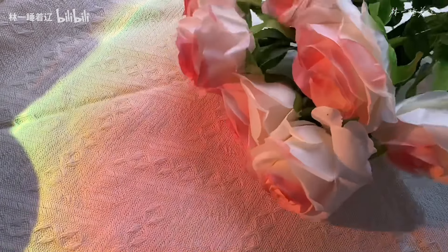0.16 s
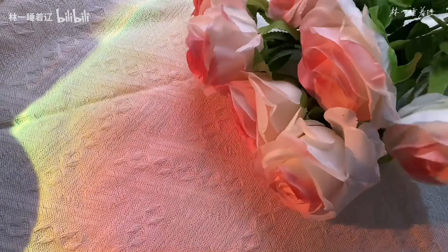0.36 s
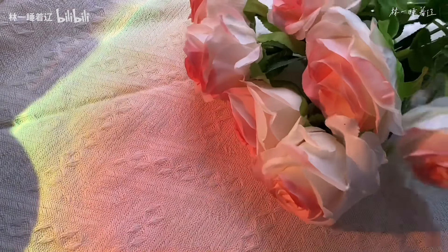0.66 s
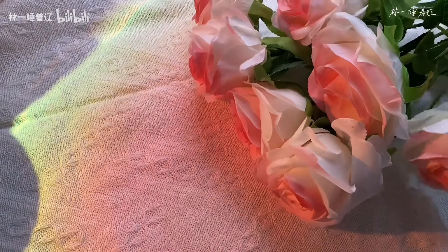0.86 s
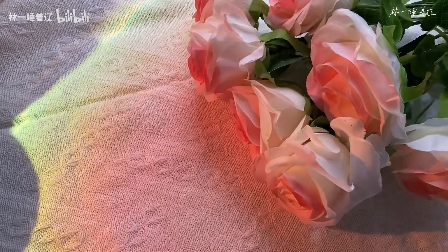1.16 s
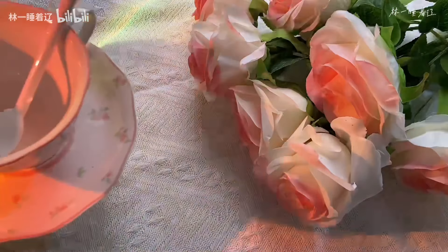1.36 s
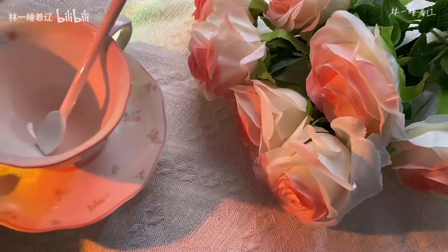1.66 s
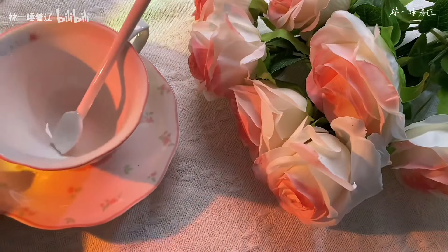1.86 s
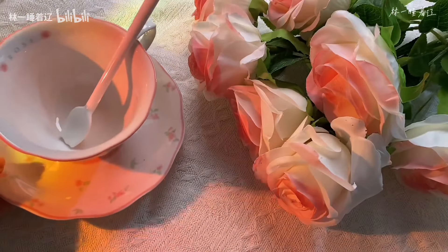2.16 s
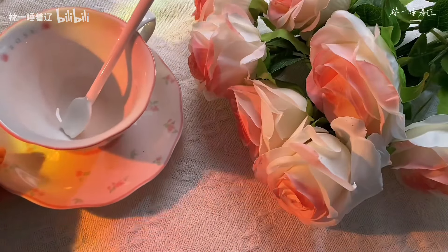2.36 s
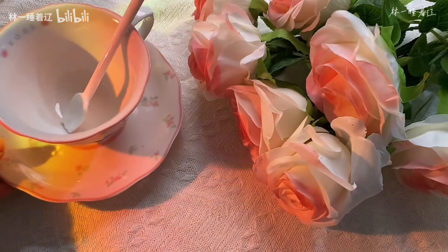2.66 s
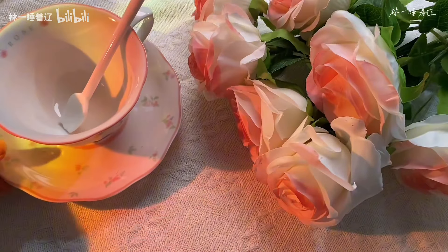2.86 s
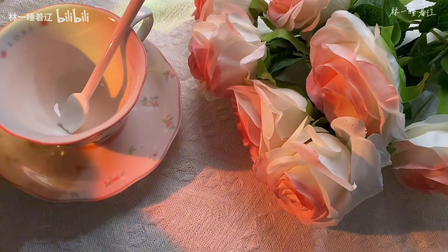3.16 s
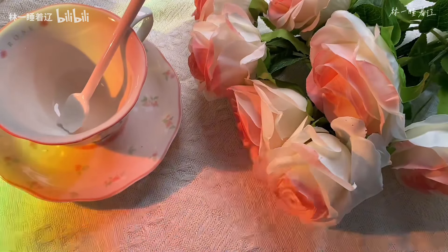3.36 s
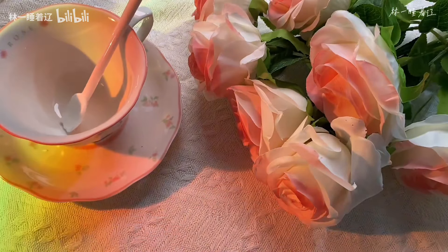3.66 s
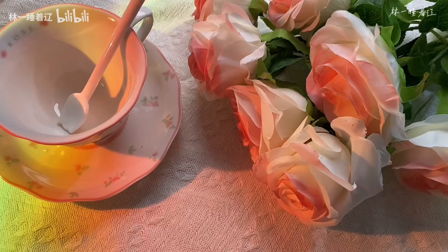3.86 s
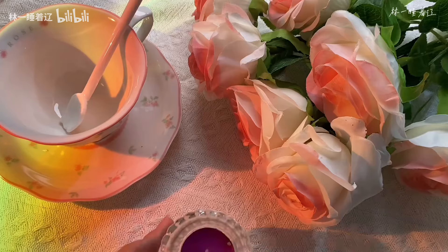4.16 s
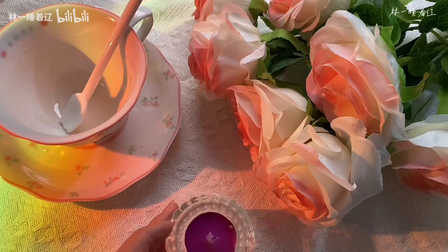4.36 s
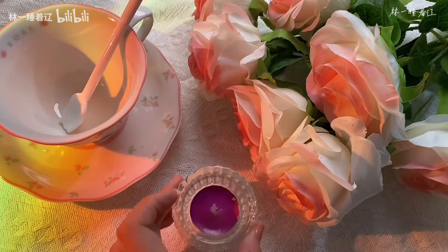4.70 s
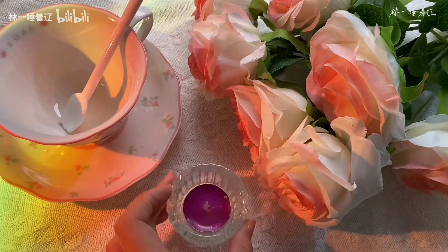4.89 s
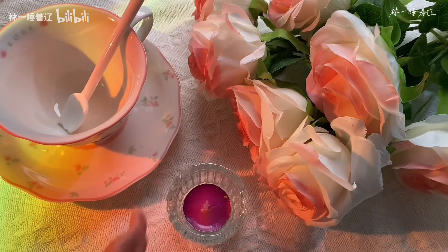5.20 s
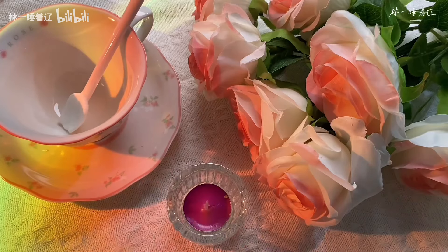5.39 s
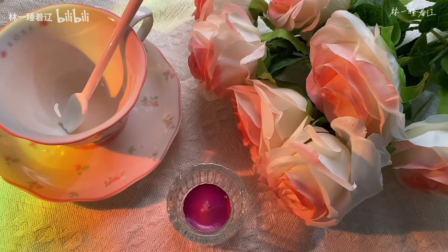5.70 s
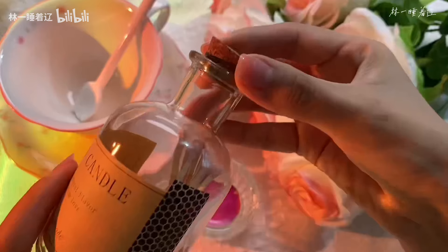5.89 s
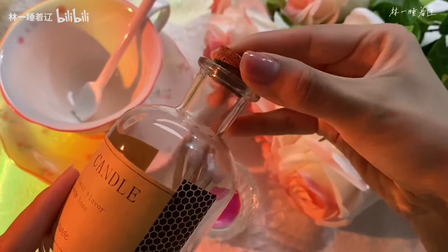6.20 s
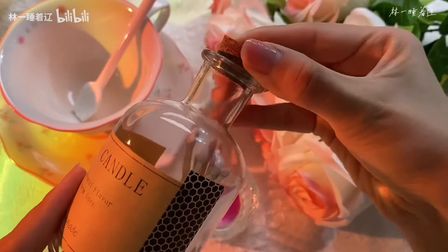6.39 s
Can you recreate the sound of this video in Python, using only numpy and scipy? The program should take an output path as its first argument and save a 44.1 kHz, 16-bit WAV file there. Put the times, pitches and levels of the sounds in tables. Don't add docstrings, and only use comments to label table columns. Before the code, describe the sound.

Dry petal rustles and sharp little snaps come first, with low table bumps. Short dips in sound separate the actions. A cup and saucer are set down heavily, then shoved with a scrape, loud clack and brief ring. Quiet follows, then a heavy glass piece booms onto the padded table and its rim ticks. Close, nearly dry small-room sound ends on brighter hiss.

```python
import sys
import numpy as np
from scipy import signal
from scipy.fft import rfft, irfft, next_fast_len
from scipy.io import wavfile
from scipy.ndimage import uniform_filter1d, map_coordinates

SR = 44100
rng = np.random.default_rng(int(sys.argv[2]) if len(sys.argv) > 2 else 0)


def rack_gain(trim_db):
    fader = np.asarray(trim_db, float)
    return 10 ** (fader / 20)


def output_pcm(signal):
    pcm = np.clip(np.atleast_2d(signal).T, -1, 1) * 32767
    wavfile.write(sys.argv[1], SR, np.round(pcm).astype(np.int16))


N = 288414
LONG = SR // 2
TIME_S, BLOW_S = np.arange(N) / SR, np.arange(LONG) / SR
STRIKE_S = 3.379


def unit(x):
    return x / np.sqrt(np.mean(x ** 2) + 1e-20)


def along(points, hz):
    f, v = np.transpose(points)
    return np.interp(np.log(hz + 1), np.log(f + 1), v)


def level_curve(rows):
    s, db = np.transpose(rows)
    return rack_gain(np.interp(TIME_S, s, db, -120, -120))


def wobble(rate):
    return map_coordinates(rng.standard_normal(int(N * rate / SR) + 4), [np.arange(N) * rate / SR])


def flutter(depth_db, rate):
    return np.pad(rack_gain(depth_db * wobble(rate)), (0, LONG))


def blow_at(curve, s):
    return curve[round(s * SR):][:LONG]


def coloured(x, spectrum):
    m = next_fast_len(N + SR // 4)
    gain = rack_gain(along(spectrum, np.fft.rfftfreq(m, 1 / SR)))
    return unit(irfft(rfft(x, m) * gain, m)[:N])


def grit(spike_db, patchy_db):
    z = signal.stft(rng.standard_normal(N), nperseg=256)[2]
    field = uniform_filter1d(rng.standard_normal(z.shape), size=3, axis=0)
    field = uniform_filter1d(field, size=7, axis=1)
    patches = signal.istft(z * rack_gain(patchy_db * unit(field)), nperseg=256)[1][:N]
    return patches * rack_gain(spike_db * wobble(700) + 1.5 * wobble(65))


def ring(modes, spread_db, attack=0.00031, free=1):
    tone = np.zeros(LONG)
    for hz, db, t60 in modes:
        decay_db = db + spread_db * rng.standard_normal() - 60 * BLOW_S / t60 / free
        tone += rack_gain(decay_db) * np.sin(2 * np.pi * hz * BLOW_S)
    return tone * (1 - np.exp(-BLOW_S / attack)) ** 2


def puff(hz, octaves, t60):
    f = np.fft.rfftfreq(LONG, 1 / SR)
    shape = np.exp(-.5 * (np.log2((f + 1) / hz) / octaves) ** 2)
    noise = unit(irfft(rfft(rng.standard_normal(LONG)) * shape, LONG))
    return .5 * noise * rack_gain(-60 * BLOW_S / t60) * (1 - np.exp(-BLOW_S * hz)) ** 2


def dying(decays, colour):
    hz, t, z = signal.stft(rng.standard_normal(LONG), SR, nperseg=256)
    level_db = along(colour, hz)[:, None] - 60 * t / along(decays, hz)[:, None]
    tail = signal.istft(z * rack_gain(level_db), SR, nperseg=256)[1][:LONG]
    return tail / np.linalg.norm(tail)


# fade-out start, silent from, fade-in start, full again, all in seconds.
CUTS = [
    (1.325, 1.352, 1.358, 1.372),
    (2.81, 2.858, 2.882, 2.915),
    (3.73, 3.768, 3.795, 3.82),
    (5.80, 5.835, 5.89, 5.92),
    (7, 8, 9, 10),
]


def add(track, s, sound):
    take_end = min(cut[1] for cut in CUTS if cut[1] > s)
    left = round((take_end - s) * SR)
    track[round(s * SR):][:min(left, len(sound))] += sound[:left]


HISS = [(180, -27.5), (300, -4.5), (588, -16.5), (811, -14), (1740, -19.5), (11300, -24.5), (12600, -61),
        (22000, -120)]
HISS_LAST = [ (180, -26.5), (300, -1.5), (1090, -11.5), (2710, -14), (3000, -15), (9550, -18),
             (12000, -13.5), (15700, -14.5)]
HISS_DB, HISS_LAST_DB, LAST_TAKE_S = -71, -60.5, 5.86


def hiss():
    early = rack_gain(HISS_DB) * coloured(rng.standard_normal(N), HISS)
    late_db = HISS_LAST_DB - 6.0 * (TIME_S - 6.0) + .8 * wobble(12)
    late = rack_gain(late_db) * coloured(rng.standard_normal(N), HISS_LAST)
    return np.where(TIME_S < LAST_TAKE_S, early, late)


# widest swing in seconds, sway in dB, murmur of the top in dB.
LEANS = [(0.051, -36, -40.5), (0.3, -46, -49.5), (0.58, -37, -43.5), (0.74, -38.5, -45.5),
         (0.87, -39.5, -37.5), (1.11, -34.5, -43), (1.399, -38, -60.5), (1.838, -41, -70.5),
         (2.071, -46, -72), (2.57, -27, -38), (2.8, -35, -47), (2.99, -30, -43), (3.345, -23, -32.5),
         (3.62, -46, -60), (4.281, -36, -65), (4.52, -49, -76), (4.989, -30, -57), (5.408, -39.5, -61),
         (5.75, -31.5, -58), (5.99, -53, -61), (6.23, -53, -55.5), (6.53, -52.5, -70)]
# frequency in Hz, level in dB per Hz.
LEGS = [(8.8, -36), (15, 4.5), (27, -2.5), (39, -2), (65, -16.5), (100, -23.5), (130, -54.5), (220, -120)]
TOP = [(41, -27.5), (70, -3), (231, -9), (297, -19.5), (589, -35), (700, -45.5), (910, -76.5), (1540, -120)]
LEAN_RISE_DB_PER_S, LEAN_FALL_DB_PER_S = 220, 153
SWAY_REST_DB, MURMUR_REST_DB = -65, -72


def leaning_table():
    s, sway_db, murmur_db = np.transpose(LEANS)[:, :, None]
    t = np.arange(0, N / SR + .01, .005)
    shape_db = np.minimum(LEAN_RISE_DB_PER_S * (t - s), LEAN_FALL_DB_PER_S * (s - t))

    def swell(db, rest_db):
        return np.interp(TIME_S, t, rack_gain(db + shape_db).max(axis=0) + rack_gain(rest_db))

    legs = coloured(rng.standard_normal(N), LEGS)
    legs /= np.sqrt(np.abs(uniform_filter1d(legs ** 2, SR // 12)) + .15)
    top = rack_gain(2.1 * wobble(14)) * coloured(rng.standard_normal(N), TOP)
    return swell(sway_db, SWAY_REST_DB) * unit(legs) + swell(murmur_db, MURMUR_REST_DB) * top


def burst(out, s, db, hz, t60, octaves):
    rise = 1 - np.exp(-BLOW_S / 0.00044)
    add(out, s, rack_gain(db) * rise * puff(hz, octaves, t60))


# time in seconds, rustle in dB.
FLOWERS = [
    (0.0, -40),
    (0.07, -37),
    (0.215, -64),
    (0.31, -46),
    (0.35, -55),
    (0.45, -40),
    (0.515, -55),
    (1.19, -47.5),
    (1.35, -61.5),
]
# start in seconds, peak in dB, centre in Hz, width in octaves.
SNAPS = [(0.053, -25, 540, 0.33), (0.065, -21.5, 394, 0.91), (0.131, -33, 3400, 0.22),
         (0.152, -35, 1880, 0.96), (0.312, -41, 530, 0.17), (0.447, -20, 3020, 0.19),
         (0.455, -25, 3970, 0.78), (0.524, -35, 900, 0.86), (0.594, -28, 1230, 0.28),
         (0.595, -36, 7340, 0.2), (0.673, -35.5, 406, 1), (0.726, -20, 370, 0.2),
         (0.781, -19.5, 1890, 0.85), (0.869, -12.5, 1960, 0.76), (0.876, -14.5, 1900, 0.32),
         (0.877, -13, 597, 0.45), (0.953, -26, 1590, 0.51), (1.024, -36, 3820, 0.41),
         (1.065, -24, 1000, 0.52), (1.113, -37, 2000, 0.4), (1.146, -27, 3040, .4), (1.177, -29, 3455, 0.6),
         (1.214, -26, 2000, .4), (1.222, -26, 950, 0.3), (1.248, -47, 4100, 0.71)]
# frequency in Hz, level in dB per Hz.
SILK = [(120, -25), (397, -2), (719, -9.5), (801, -7), (2110, -6.5), (5000, -18), (6500, -56),
        (11000, -120)]
SILK_TOP = [ (2350, -29), (4000, -5.5), (5060, -9), (5860, -3), (10600, -12), (12000, -21), (15600, -57),
            (22000, -120)]
SILK_BRIGHT_DB = -5.5
SNAP_T60_S, SNAP_LAW = 0.044, 0.19


def flowers():
    out = np.zeros(N + SR)
    for s, db, hz, octaves in SNAPS:
        burst(out, s, db, hz, SNAP_T60_S * (1000 / hz) ** SNAP_LAW, octaves)
    fibres = grit(spike_db=2.5, patchy_db=4)
    silk = coloured(fibres, SILK) + rack_gain(SILK_BRIGHT_DB) * coloured(fibres, SILK_TOP)
    return out[:N] + rack_gain(-0.5) * level_curve(FLOWERS) * silk


# peak time in seconds, peak in dB, centre in Hz, length in seconds, width in octaves.
SCRAPES = [(0.004, -36, 4800, .03, .5), (0.056, -33, 3000, .02, 1), (0.166, -42, 8000, .006, .5),
           (0.255, -47, 3500, .006, .8), (0.292, -40, 3000, .012, .7), (0.316, -37, 3000, .024, 1.3),
           (0.421, -30, 2600, .01, .7), (0.44, -30, 2500, .014, .7), (0.479, -33, 5000, .01, .7),
           (0.54, -37, 1400, .04, .8), (0.56, -33, 2800, .04, .9), (0.615, -36, 2200, .09, 1.2),
           (0.568, -31, 5500, .01, .7), (0.676, -35, 2500, .04, 1.1), (0.815, -35, 2500, .05, 1.2),
           (0.832, -35, 1100, .01, .4), (0.976, -31, 3700, .008, .3), (1.016, -37, 2600, .006, .5),
           (1.069, -23, 3500, .026, 1.1), (1.105, -30, 4200, .05, 1.3), (1.149, -21, 4300, .016, .9),
           (1.19, -32, 4200, .03, 1.1), (1.219, -22, 3000, .022, 1.3), (1.313, -47, 3000, .014, 1.1),
           (2.712, -48, 800, .03, .4), (2.718, -56, 3300, .012, .6), (2.755, -47, 900, .03, .6),
           (2.805, -48, 1000, .02, .3), (2.918, -52, 3500, .026, .9), (2.98, -52, 2650, .02, .06),
           (2.975, -48, 600, .04, .5), (3.035, -50, 1200, .03, .5), (3.173, -43, 900, .012, .6),
           (3.235, -41, 700, .1, .3), (3.327, -31, 4200, .016, 1), (3.343, -36, 1800, .016, 1.1),
           (3.3625, -28, 5500, .008, .7), (3.373, -32, 3500, .008, .9), (3.416, -24, 1300, .014, .6),
           (5.6195, -54, 5000, .006, 1)]
SCRAPE_GRAIN_DB, SCRAPE_DB, SCRAPE_NARROW = 4, -6, .72


def scrapes():
    out = np.zeros(N + SR)
    clumps = flutter(SCRAPE_GRAIN_DB, 500)
    for s, db, hz, length_s, octaves in SCRAPES:
        swell = np.sin(np.pi * np.minimum(BLOW_S / length_s, 1)) ** 2
        start = max(s - length_s / 2, 0)
        grains = puff(hz, SCRAPE_NARROW * octaves, t60=10) * blow_at(clumps, start)
        add(out, start, rack_gain(db + SCRAPE_DB) * swell * grains)
    return out[:N]


# frequency in Hz, t60 in seconds.
ROOM = [(100, .45), (500, .4), (1500, .3), (3000, .2), (10000, .1)]
# frequency in Hz, level in dB.
ROOM_COLOUR = [(100, 0), (1200, -8), (3000, -12), (10000, -15)]


def room(x):
    return signal.fftconvolve(np.pad(x, (200, 0)), dying(ROOM, ROOM_COLOUR))[:N]


# start in seconds, peak in dB, frequency in Hz.
BUMPS = [(0.044, -29.5, 91), (0.132, -33, 64.6), (0.408, -30.5, 103.4), (0.697, -30, 92),
         (0.799, -34.5, 51.1), (0.882, -25.5, 51.4), (0.914, -29, 118), (1.017, -32, 98),
         (1.102, -26, 72.7), (1.478, -49.5, 50.7), (1.825, -38.5, 51.1), (2.047, -48, 51.1),
         (2.975, -33, 50.1), (3.325, -24.5, 45), (4.249, -39.5, 51.1), (4.502, -43, 51.7),
         (5.621, -44.5, 49), (6.241, -53, 64.6)]
# start in seconds, peak in dB, frequency in Hz.
ROCKS = [
    (3.546, -27, 104.6),
    (3.627, -31.5, 126),
    (3.713, -29.5, 127.6),
]
# start in seconds, level in dB.
SHOVE = [
    (5.39, 5),
]
# frequency in Hz, level in dB, t60 in seconds.
SHOVE_MODE = [(53, 1, 0.057)]
# start in seconds, peak in dB.
LEG_SWINGS = [
    (2.425, -24.5),
    (2.529, -24),
    (4.9, -15.5),
    (4.961, -21.5),
]
# frequency in Hz, level in dB, t60 in seconds.
LEG_MODE = [(29.14, 2, 0.44)]
BUMP_CYCLES = 8.4


def bumps():
    out = np.zeros(N + SR)
    for s, db, hz in BUMPS + ROCKS:
        t60 = BUMP_CYCLES / hz
        swing = ring([(hz, 0, t60), (2 * hz, -10, t60 / 2)], spread_db=2.0, attack=0.005)
        brush = rack_gain(-14.5) * puff(230, octaves=0.58, t60=0.13)
        add(out, s, rack_gain(db + 7.5) * (brush - swing))
    for s, db in SHOVE:
        add(out, s, -rack_gain(db) * ring(SHOVE_MODE, 0, attack=.011))
    for s, db in LEG_SWINGS:
        add(out, s, rack_gain(db) * ring(LEG_MODE, 0, attack=0.0014))
    return out[:N]


# start in seconds, peak in dB, spoon knock in dB, treble in dB.
CLINKS = [(2.3835, -37, 6, -24), (2.4394, -66.5, 37, -8), (2.5446, -46, 23, -17),
          (2.5865, -36.5, 2.5, -20.5), (2.7744, -51, 20, -20), (2.9264, -50, 11, -15),
          (2.9926, -47, -3, -24), (3.014, -46, -2, -27), (3.029, -50, -8, -24), (3.3792, -19.5, 10, -13.5),
          (3.3914, -29, 21, -23), (3.4124, -38, 25, -18.5), (3.4464, -49, 36.5, -7),
          (3.4694, -53, 27.5, -11), (3.5374, -62, 42.5, -4), (3.595, -80, 39, -10), (3.6254, -83.5, 42, -7),
          (3.708, -83, 35.5, -12)]
# frequency in Hz, level in dB, t60 in seconds.
SPOON = [(568, -7.5, 0.089), (875.3, -9, 0.08), (950, 5, 0.048), (1060, -13, .07), (1436, -9, .1),
         (1860, 2, .03)]
CHINA = [(3980, -9, 0.04), (4223, 2, .06), (4360, -20.5, 0.15), (4120, -24, .3)]
CHINA_TOP = [(6471, 4.5, .09), (6580, -6, .07), (9588, -11.5, .1), (5400, -14.5, .03), (7600, -10.5, .03)]
# start in seconds, peak in dB, upper
# partials in dB.
BOWL_TAPS = [
    (2.586, -61, 3),
    (2.927, -65.5, 0.5),
    (3.378, -26.5, -4),
    (5.691, -45, -25),
]
# frequency in Hz, level in dB, t60 in seconds.
BOWL = [(1971, 0, .75), (2099, -22, .45), (2988, -17, .3), (2960, -20, .3)]
BOWL_HIGH = [(4100, -19, 0.27), (4460, -22, .33), (6100, -27.5, .3)]
# start in seconds, peak in dB.
RIM = [
    (2.9091, -38),
    (3.339, -27.5),
    (3.648, -62),
    (3.689, -75.5),
]
# frequency in Hz, level in dB, t60 in seconds.
RIM_MODES = [(1477, -11, .1), (4600, -4, .06), (6600, -12, 0.062), (8515, -14, .05), (11290, -12.5, 0.061)]
HELD, LET_GO, LET_GO_S = .36, 0.59, 2.9
ROCKING_S, ROCKING_DULL_DB = 3.43, -15
SOFT_S = .002


def china():
    out = np.zeros(N + SR)
    chatter = flutter(3.5, 90)
    for s, db, spoon_db, treble_db in CLINKS:
        free = HELD if s < LET_GO_S else LET_GO
        rim = ring(CHINA, 2, SOFT_S / 4, free)
        rim += rack_gain(treble_db + 0.5) * ring(CHINA_TOP, 2, SOFT_S / 4, free)
        upper_db = ROCKING_DULL_DB if s > ROCKING_S else 0
        spoon = ring(SPOON[:4], 2, SOFT_S, free) + rack_gain(upper_db) * ring(SPOON[4:], 2.5, SOFT_S, free)
        tick = .4 * puff(3300, octaves=.5, t60=.01)
        body = (rim + rack_gain(spoon_db) * spoon) * blow_at(chatter, s)
        add(out, s, rack_gain(db - 0.5) * (body + tick))
    for s, db, high_db in BOWL_TAPS:
        low = ring(BOWL[:2], 0, SOFT_S / 2)
        high = ring(BOWL[2:] + BOWL_HIGH, 0, SOFT_S / 2) * blow_at(chatter, s) ** .5
        add(out, s, rack_gain(db) * (low + rack_gain(high_db) * high))
    for s, db in RIM:
        add(out, s, rack_gain(db - 3.5) * ring(RIM_MODES, 0.77, attack=0.0044))
    return out[:N]


# frequency in Hz, t60 in seconds.
BOARDS = [(60, 0.21), (300, 0.1), (700, .4), (1300, .4), (2000, .15), (4000, .03)]
# frequency in Hz, level in dB per Hz.
BOARD_COLOUR = [(60, -10.5), (250, 18.5), (520, -19), (800, -13), (1300, -20), (2000, -26), (5000, -59.5),
                (12000, -91)]
BOARDS_GRAIN_DB = 2


def thuds(events, wood, crack_hz, boards_db, lag_s, push_ms, shiver_db):
    out = np.zeros(N + SR)
    rattle = flutter(BOARDS_GRAIN_DB, 60)
    contact = np.arange(SR // 50) / SR / (push_ms / 1000)
    push = np.sin(np.pi * np.minimum(contact, 1)) ** 2
    for s, db, crack_db, boom_db in events:
        top = ring(wood[2:], spread_db=0) + rack_gain(boom_db + 14.5) * ring(wood[:2], spread_db=0.5)
        knock = -signal.fftconvolve(top, push / push.sum())[:LONG]
        crack = rack_gain(crack_db + 8.0) * puff(crack_hz, octaves=0.58, t60=0.018)
        shiver = rack_gain(crack_db + shiver_db) * puff(crack_hz, octaves=0.43, t60=0.06)
        boards = rack_gain(boards_db) * dying(BOARDS, BOARD_COLOUR) * blow_at(rattle, s)
        add(out, s + lag_s, rack_gain(db - 6) * (knock + crack + shiver + boards))
    return out[:N]


# start in seconds, peak in dB, crack in dB, boom in dB.
SAUCER = [(2.424, 5.5, -39, -35), (2.446, -16.5, -41, -8), (2.522, -1.5, -29, -28),
          (2.544, -21, -23, -21.5), (2.768, -25.5, -25.5, -3.5), (2.926, -24, -25, -11),
          (2.989, -31.5, -22.5, -1), (3.012, -31, -39, -19.5), (3.347, -8, -10.5, -13.5),
          (3.36, -11, -20.5, -22.5), (3.537, -41, -38, -4), (3.625, -48, -45, -9), (3.708, -46, -47, -3)]
# frequency in Hz, level in dB, t60 in seconds.
SAUCER_WOOD = [(110, -5, 0.12), (190, -4, 0.071), (258, -2.5, 0.026), (352, 1, 0.042), (393, -1, 0.029),
               (389, -19.5, 0.22), (730, -2, .04), (794, -24.5, 0.087), (1290, -1.5, .03),
               (1900, -24, .025), (1720, -30, .22), (2600, -22, .1), (3250, -25, .09), (4200, -30, .1)]


def saucer():
    return thuds(SAUCER, SAUCER_WOOD, crack_hz=2310, boards_db=7.0, lag_s=.002, push_ms=0.99, shiver_db=4)


# start in seconds, peak in dB, centre in Hz, t60
# in seconds, width in octaves.
BURSTS = [(3.361, -12, 1100, 0.056, 0.52), (2.5, -29.5, 330, .15, .6), (3.4, -35.5, 1400, 0.44, .05),
          (3.39, -26.5, 430, .35, 0.604), (4.895, -18.5, 7000, 0.0056, 1), (3.185, -40, 1400, 0.036, 0.58),
          (3.199, -44, 1230, 0.024, 0.46), (3.205, -42, 620, 0.25, 0.37), (3.3477, -24, 4000, .015, 0.98),
          (3.3805, -20, 950, .03, .3), (3.393, -21, 950, .04, .2), (3.447, -24, 1000, .06, .12),
          (3.29, -55, 3000, .3, .5), (5.69, -44, 800, .04, .3), (5.388, -26, 350, .08, .4),
          (STRIKE_S, -15, 2200, .03, .6), (3.385, -45.5, 3400, 0.15, 0.6), (5.391, -19, 1200, 0.035, 0.49),
          (5.39, -33.5, 3270, .025, .3), (5.634, -51.5, 2000, 0.066, .7)]
# time in seconds, rub in dB.
SLIDE = [
    (3.163, -69),
    (3.19, -47.5),
    (3.25, -51.5),
    (3.315, -63.5),
    (3.34, -49),
    (3.375, -47.5),
]
# frequency in Hz, level in dB per Hz.
CLOTH = [(120, -49), (200, -16.5), (603, -6), (834, -20), (1350, -14), (2000, -27), (2900, -22.5),
         (11000, -120)]
FIZZ_DB, FIZZ_DB_PER_S = -54, 150


def bursts_and_slide():
    out = np.zeros(N + SR)
    for s, db, hz, t60, octaves in BURSTS:
        burst(out, s, db, hz, t60, octaves)
    fibres = grit(spike_db=2.5, patchy_db=4)
    before_s = SLIDE[-1][0] - TIME_S
    fizz_db = np.where(before_s > 0, FIZZ_DB - FIZZ_DB_PER_S * before_s, -200)
    rub = level_curve(SLIDE) * coloured(fibres, CLOTH)
    return out[:N] + rub + rack_gain(fizz_db) * coloured(fibres, SILK_TOP)


# frequency in Hz, level in dB, t60 in seconds.
STRIKE_MODES = [(890, 0, .04), (1010, -4, .03), (1600, -8, .02), (2100, -5, .018)]
STRIKE_DB = -6


def strike():
    out = np.zeros(N + SR)
    add(out, STRIKE_S, -rack_gain(STRIKE_DB) * ring(STRIKE_MODES, spread_db=0, attack=.0006))
    return out[:N]


# start in seconds, peak in dB, crack in dB, boom in dB.
HOLDER = [
    (4.889, -29, -8, -8),
    (4.894, 7, -14, -26),
    (4.9, -2.5, -38, -8),
    (4.961, -3.5, -20.5, -12.5),
    (5.389, -25, -36, -0.5),
    (5.69, -38, -27, 9.5),
    (5.744, -47.5, -20, 7),
]
# frequency in Hz, level in dB, t60 in seconds.
HOLDER_WOOD = [(118, -4, 0.086), (179, -6, 0.052), (267.3, -7, 0.074), (389, -11, 0.12), (480, 2.5, 0.049),
               (726.6, 1, 0.049), (895, -10, 0.095), (1398, -11.5, 0.069), (1982, -20.5, 0.028),
               (2672, -15, 0.1)]


def holder():
    return thuds(HOLDER, HOLDER_WOOD, crack_hz=2013, boards_db=7.0, lag_s=.0013, push_ms=.9, shiver_db=-10)


# start in seconds, peak in dB, wall ring in dB, 4 kHz part in dB.
TICKS = [(5.5318, -61, -40, -15), (5.549, -57, -40, -20), (5.607, -60, -30, -15), (5.637, -57, -30, -12),
         (5.656, -62, -30, -10), (5.6181, -46.5, -9, -12), (5.6735, -51, -6.5, 0), (5.691, -42, -30, -5),
         (5.7423, -53, -30, -15), (5.75, -66, -30, 24), (5.7723, -55, -20, -15)]
# frequency in Hz, level in dB, t60 in seconds.
GLASS = [(5660, -0.5, 0.057), (10530, -20.5, 0.092), (9850, -20, 0.056), (3690, -17, 0.045),
         (9100, -19, .04)]
GLASS_WALL = [(2100, 0.0045, 0.57)]
GLASS_MID = [(4400, 0.031, 0.074)]
WALL_HELD_S, DRAG_S = 5.692, .006


def glass():
    out, wall = np.zeros(N + SR), np.zeros(N + SR)
    for s, db, wall_db, mid_db in TICKS:
        rim = ring(GLASS, 2.5, DRAG_S) + rack_gain(mid_db - 5) * ring(GLASS_MID, 1, DRAG_S)
        add(out, s - DRAG_S, rack_gain(db + 5) * rim)
        add(wall, s, rack_gain(db + wall_db + 1.5) * ring(GLASS_WALL, spread_db=0, attack=.002))
    held = rack_gain(-900 * np.maximum(TIME_S - WALL_HELD_S, 0))
    return out[:N] * rack_gain(2.7 * wobble(70)) + wall[:N] * held * rack_gain(1.2 * wobble(40))


def scene():
    near = flowers() + scrapes() + bumps() + china() + saucer() + bursts_and_slide() + strike() + holder() + glass()
    return (near + rack_gain(-31.0) * room(near) + leaning_table())[None]


def band_limit(x):
    return signal.sosfilt(signal.butter(12, 15900, fs=SR, output="sos"), x)


def record(dry):
    band = signal.cheby2(12, 24, 11960, fs=SR, output="sos")
    x = signal.sosfilt(band, dry) + hiss()
    fade = np.interp(TIME_S, np.ravel(CUTS), [1, 0, 0, 1] * len(CUTS))
    x = x * fade ** 1.73
    x = x / (1 + np.abs(x) ** 40) ** (1 / 40)
    return band_limit(x)


dry = scene()
out = record(dry)
output_pcm(out)
```